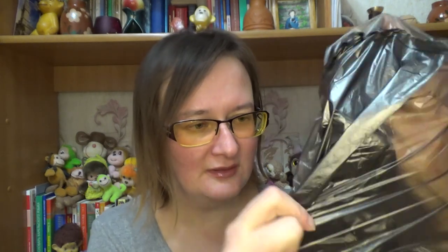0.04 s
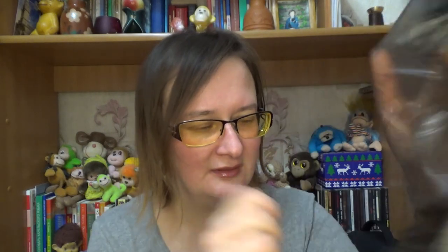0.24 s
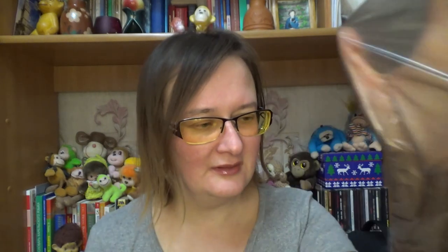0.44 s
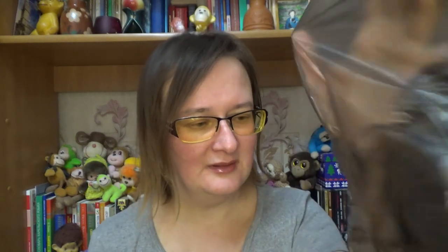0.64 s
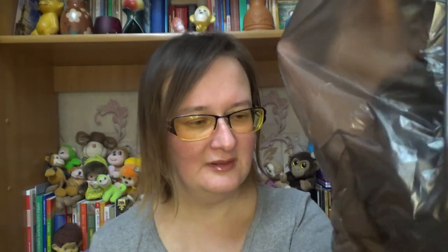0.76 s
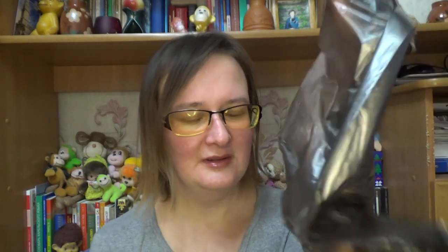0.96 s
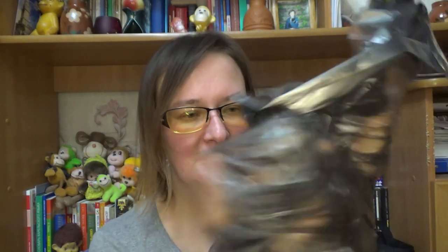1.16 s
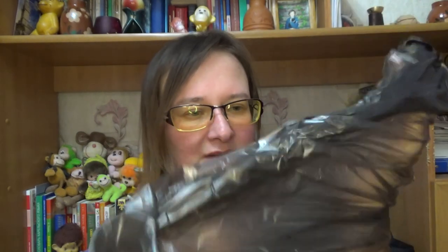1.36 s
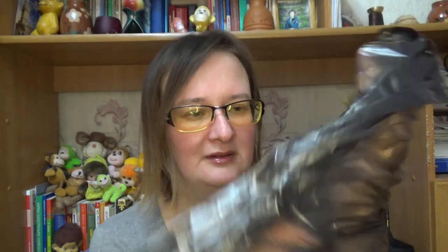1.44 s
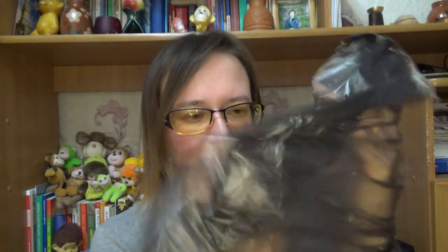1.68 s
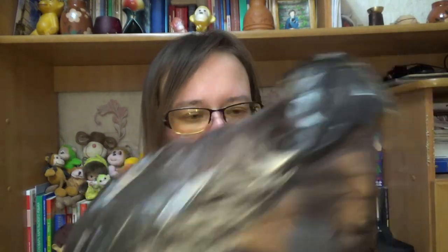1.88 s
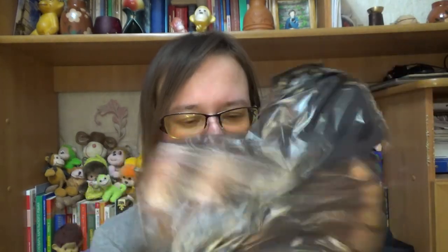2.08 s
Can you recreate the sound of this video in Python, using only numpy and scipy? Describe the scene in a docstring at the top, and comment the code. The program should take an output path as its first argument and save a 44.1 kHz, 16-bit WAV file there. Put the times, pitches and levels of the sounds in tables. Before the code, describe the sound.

A thin plastic garbage bag crinkles throughout, close up in a small room: dense bright crackle and hiss over a lower rustle, with tiny snaps and faint air puffs. It starts right of centre and swings farther right, sounding hollower from 0.2 to 0.5 seconds. The crinkling swells from 0.6 to 1.3 seconds while moving to the front, eases briefly, then surges again around 1.7 and 2.1 seconds.

```python
"""A thin plastic garbage bag is pulled open and shaken near a microphone in a small furnished room.
Thousands of creases buckle each second over the hiss of film sliding on film; a few snap out singly.
The broad sheet rustles lower down and puffs air as it billows.
The bag swings out to the right, where it sounds hollower, then comes round to the front."""
import sys
import numpy as np
from scipy import signal
from scipy.fft import rfft, irfft, next_fast_len
from scipy.io import wavfile
from scipy.ndimage import uniform_filter1d, map_coordinates

SR = 44100
rng = np.random.default_rng(int(sys.argv[2]) if len(sys.argv) > 2 else 0)


def generate_wav(sig):
    """Save sig (samples, or channels by samples) to the path in sys.argv[1] as 16-bit PCM at SR."""
    pcm = np.round(np.clip(np.atleast_2d(sig).T, -1, 1) * 32767).astype(np.int16)
    wavfile.write(sys.argv[1], SR, pcm)


N = 93227


def amp(db):
    """Decibels to gain."""
    return 10 ** (np.asarray(db) / 20)


def unit_rms(x):
    """Scale to rms 1."""
    return x / np.sqrt(np.mean(x ** 2) + 1e-20)


def at_hz(points, hz):
    """Interpolate (f/Hz, value) points on a log axis."""
    f, values = np.transpose(points)
    return np.interp(np.log(hz + 1), np.log(f + 1), values)


def curve(points):
    """Interpolate (t/s, value) points per sample."""
    return np.interp(np.arange(N) / SR, *np.transpose(points))


def wobble(knots_per_s):
    """Smooth random curve."""
    return map_coordinates(rng.standard_normal(N // 20), [np.arange(N) * knots_per_s / SR], mode="wrap")


def filtered(x, response):
    """Apply a frequency response."""
    size = 2 * next_fast_len(N)
    return irfft(rfft(x, size) * response(np.fft.rfftfreq(size, 1 / SR)), size)[..., :N]


def coloured(x, spectrum):
    """Minimum-phase filter from (f/Hz, level/dB) points."""
    def response(hz):
        cepstrum = irfft(np.log(amp(at_hz(spectrum, hz))))
        half = len(cepstrum) // 2
        causal_window = np.r_[1, np.full(half - 1, 2), 1, np.zeros(half - 1)]
        return np.exp(rfft(cepstrum * causal_window))
    return filtered(x, response)


def patchy(x, depth_db):
    """The colour wanders as the folds change: gain patches of about 1.5 kHz by 40 ms."""
    spectra = signal.stft(x, nperseg=256)[2]
    field = uniform_filter1d(rng.standard_normal(spectra.shape), size=9, axis=0)
    field = uniform_filter1d(field, size=14, axis=1)
    return signal.istft(spectra * amp(depth_db * unit_rms(field)), nperseg=256)[1][:N]


def buckles(per_s, spread_db, decay_s, top_hz, count=40000, size=96):
    """Buckling film gives tiny damped ticks of random pitch and strength; rms 1 at any rate."""
    waits = rng.exponential(size=count)
    strength = np.clip(rng.standard_normal(count), -3, 2.2)
    pitch, phase = rng.random((2, count, 1))
    starts = np.searchsorted(np.cumsum(per_s * np.ones(N)) / SR, np.cumsum(waits))
    heard = starts < N
    t = np.arange(size) / SR
    tones = np.cos(2 * np.pi * (top_hz * pitch[heard] * t + phase[heard]))
    ticks = amp(spread_db * strength[heard, None]) * np.exp(-t / decay_s) * tones
    indices = starts[heard, None] + np.arange(size)
    train = np.bincount(indices.ravel(), ticks.ravel(), N)[:N]
    return unit_rms(train / np.sqrt(per_s))


# How hard the film is worked: t/s, level/dB
EFFORT_DB = [(0, -19), (.075, -18.5), (.11, -13), (.16, -21.5), (.195, -18), (.22, -19), (.26, -15),
             (.32, -16.5), (.395, -26.5), (.42, -22.5), (.475, -20), (.52, -23), (.565, -20.5), (.59, -15),
             (.66, -16), (.71, -18), (.765, -15.5), (.825, -20), (.88, -14), (.92, -18), (.95, -14),
             (.97, -17.5), (.995, -13.5), (1.06, -14), (1.2, -13), (1.3, -16.5), (1.335, -22), (1.44, -19),
             (1.51, -21), (1.58, -19.5), (1.61, -14), (1.65, -12.5), (1.74, -14), (1.785, -19),
             (1.84, -16.5), (1.9, -20.5), (1.995, -18.5), (2.04, -13.5), (2.11, -13)]
# Crackle and hiss spectrum: f/Hz, level/dB
FILM_SPECTRUM_DB = [(1000, -45), (3000, -20), (4300, -12), (5100, -7), (5900, .3), (6500, -.6), (7300, -.3),
                    (9000, -1.3), (10700, -.5), (11500, .8), (12600, .5), (13400, -3.7), (14700, -8),
                    (15800, -8.3)]


def crinkle():
    """More effort buckles more creases, and harder, in small clumps; sliding film hisses beneath."""
    effort_db = curve(EFFORT_DB)
    creases_per_s = 6000 * amp(effort_db - effort_db.mean()) ** .9
    creases = buckles(creases_per_s, spread_db=2, decay_s=.00012, top_hz=17600)
    crackle = amp(-3.5) * unit_rms(coloured(creases, FILM_SPECTRUM_DB))
    hiss = amp(-2.5) * unit_rms(coloured(rng.standard_normal(N), FILM_SPECTRUM_DB))
    clumps_db = .82 * wobble(90)
    return amp(effort_db + clumps_db) * patchy(crackle + hiss, depth_db=.8)


# Rustle envelope: t/s, level/dB
RUSTLE_DB = [(0, -29.5), (.08, -31), (.11, -26.5), (.16, -34.5), (.27, -26.5), (.39, -36.5), (.45, -32),
             (.53, -36.5), (.6, -30.5), (.95, -29.5), (1.14, -27), (1.28, -30.5), (1.34, -38.5),
             (1.43, -34), (1.57, -34.5), (1.62, -28), (1.73, -28.5), (1.78, -32.5), (1.99, -33),
             (2.09, -26.5)]
# Rustle spectrum: f/Hz, level/dB
RUSTLE_SPECTRUM_DB = [(20, -27), (50, -13.5), (100, -8.5), (230, -6.5), (340, -6), (540, -3), (850, -3.5),
                      (1600, -1.4), (2600, 0.5), (3500, 0.86), (4500, 0), (7000, -17.5), (15000, -68)]


def rustle():
    """Broad folds of the sheet give way with a lower, papery sound."""
    folds = buckles(per_s=6000, spread_db=-.5, decay_s=.00017, top_hz=8200)
    level_db = curve(RUSTLE_DB) + .37 + wobble(61.2)
    return amp(level_db) * unit_rms(coloured(folds, RUSTLE_SPECTRUM_DB))


# Top treble gain: t/s, level/dB
SPARKLE_DB = [(0, -.5), (.2, -2), (.28, 1.2), (.4, -.5), (.62, 0), (.88, .5), (1.0, -1.3), (1.2, -1.3),
              (1.38, 2), (1.68, 1.5), (1.83, -.5), (2.11, 0)]


def sparkle(film, corner_hz=9500):
    """The top treble rises and falls as the film crumples tighter or looser."""
    treble = filtered(film, lambda hz: 1 - 1 / (1 + (hz / corner_hz) ** 10))
    return film + (amp(curve(SPARKLE_DB)) - 1) * treble


# Crease snaps, the long one at 0.412 s a short crunch: t/s, peak level/dB, decay/ms
CREASE_SNAPS = [(.0226, -10, .3), (.0468, -8, .3), (.0857, -9, .6), (.1423, -9, .3), (.1671, -6, .25),
                (.2313, -7, .3), (.3165, -7, .3), (.3218, -7, .3), (.3343, -10, .3), (.3521, -10, .3),
                (.3759, -12, .6), (.412, -7.5, 2), (.4304, -11, .6), (.7367, -10, .3), (.7746, -9, .3),
                (.8035, -11, .3), (.869, -8, .2), (.9575, -9, .3), (1.3251, -8, .2), (1.3434, -12, .2),
                (1.3649, -12, .5), (1.3789, -12, .5), (1.3888, -12, .5), (1.554, -10, .4)]
# Snap spectrum: f/Hz, level/dB
SNAP_SPECTRUM_DB = [(100, -4), (1500, -9.5), (4000, -4), (6000, -3), (12500, 7), (15500, -2), (16500, -26)]


def snaps(size=512):
    """A taut crease flips over with a sharp crack; a longer decay gives a short crunch."""
    track = np.zeros(N + size)
    t_ms = 1000 * np.arange(size) / SR
    colour = amp(at_hz(SNAP_SPECTRUM_DB, np.fft.rfftfreq(size, 1 / SR)))
    lead = size // 8  # space for the filter's pre-ring
    for start_s, peak_db, decay_ms in CREASE_SNAPS:
        burst = rng.standard_normal(size) * np.exp(-t_ms / decay_ms)
        crack = irfft(rfft(np.roll(burst, lead)) * colour)
        track[int(start_s * SR) - lead:][:size] += amp(peak_db) * crack / abs(crack).max()
    return track[:N]


# Air puffs: centre t/s, half-width/s, level/dB
AIR_PUFFS = [(.115, .025, -43), (.278, .022, -35), (.82, .2, -47), (1.13, .05, -42), (1.24, .05, -44),
             (1.7, .05, -42), (2.075, .025, -38)]
# Puff spectrum: f/Hz, level/dB
PUFF_SPECTRUM_DB = [(20, -24), (50, -7), (85, -0.5), (120, -4), (210, -3), (320, -6.5), (600, -2),
                    (2000, -61)]


def billows():
    """The swinging bag pushes soft puffs of air."""
    t = np.arange(N) / SR
    swell = sum(amp(level_db) * np.exp(-((t - centre_s) / half_s) ** 2)
                for centre_s, half_s, level_db in AIR_PUFFS)
    return swell * unit_rms(coloured(rng.standard_normal(N), PUFF_SPECTRUM_DB))


# Hollowness: t/s, share/0-1
HOLLOW_SHARE = [(.16, 0), (.24, .9), (.32, 1), (.44, .9), (.56, 0)]
# Hollow colour: f/Hz, level/dB
HOLLOW_EQ_DB = [(200, 0), (3500, 0), (4800, 2.5), (6200, 1), (7800, -1), (9500, -4.7), (10900, -4.7),
                (11800, 1.3), (13000, 2), (14300, 4.7), (16000, 3)]


def held_aside(film):
    """Held out to the side, the film sounds hollower."""
    share = curve(HOLLOW_SHARE)
    return (1 - share) * film + share * coloured(film, HOLLOW_EQ_DB)


# Room decay: f/Hz, T60/s
ROOM_T60_S = [(150, 0.42), (2000, 0.14), (8000, 0.18), (16000, 0.28)]
# Diffuse difference between the channels: f/Hz, level/dB
ROOM_SIDE_DB = [(60, -9), (600, -6), (1500, -35), (5000, -40), (7000, -4.5), (10500, -3.5), (11400, -1),
                (12200, -44), (15000, -57)]


def room(bag, count=10):
    """A short, narrow stereo tail; random tails crossfade in turn as the bag moves."""
    hz, t, spectra = signal.stft(rng.standard_normal((count, 2, SR // 3)), SR, nperseg=256)
    decay = amp(-60 * t / at_hz(ROOM_T60_S, hz)[:, None])
    tails = signal.istft(spectra * decay, SR, nperseg=256)[1]
    tails /= np.linalg.norm(tails, axis=-1, keepdims=True)
    tail_offset = np.linspace(0, count - 1, N) - np.arange(count)[:, None]
    fades = np.sqrt(np.maximum(0, 1 - abs(tail_offset)))
    mid, side = signal.fftconvolve((fades * bag)[:, None], tails, axes=-1).sum(axis=0)[:, :N]
    side = filtered(side, lambda hz: amp(at_hz(ROOM_SIDE_DB, hz)))
    return np.array([mid + side, mid - side])


# Bag position: t/s, pan (0 ahead, 1 far right)
BAG_PAN = [(0, 0.48), (.15, 0.44), (.3, 0.78), (.55, 0.79), (.75, 0.64), (1.13, 0.35), (1.2, 0), (2.11, 0)]
# Left minus right at far right: f/Hz, level/dB
FAR_RIGHT_DB = [(60, -2), (180, 1.5), (400, -7), (700, -9.5), (1300, -5.5), (3000, -6.5), (4500, -4),
                (5700, -2.5), (7300, -3), (10500, -4), (11800, 0.2)]


def swing(ahead):
    """Off to the right, the bag is louder in the right channel at most frequencies."""
    right = filtered(ahead, lambda hz: amp(np.outer([.5, -.5], at_hz(FAR_RIGHT_DB, hz))))
    return ahead + curve(BAG_PAN) * (right - ahead)


def scene():
    """Film sounds and air puffs in the room, panned with the bag."""
    film = sparkle(crinkle() + rustle() + snaps())
    bag = held_aside(film) + billows()
    return swing(bag + amp(-13) * room(bag))


def record(dry, ceiling=.95, knee=4, top_hz=15800):
    """The recorder rounds off the highest peaks and keeps nothing above its band limit."""
    rounded = dry / (1 + abs(dry / ceiling) ** knee) ** (1 / knee)
    return filtered(rounded, lambda hz: hz < top_hz)


dry = scene()
out = record(dry)
generate_wav(out)
```